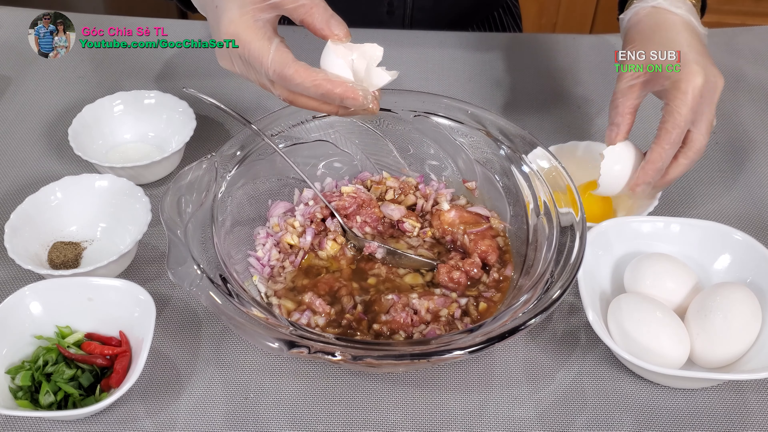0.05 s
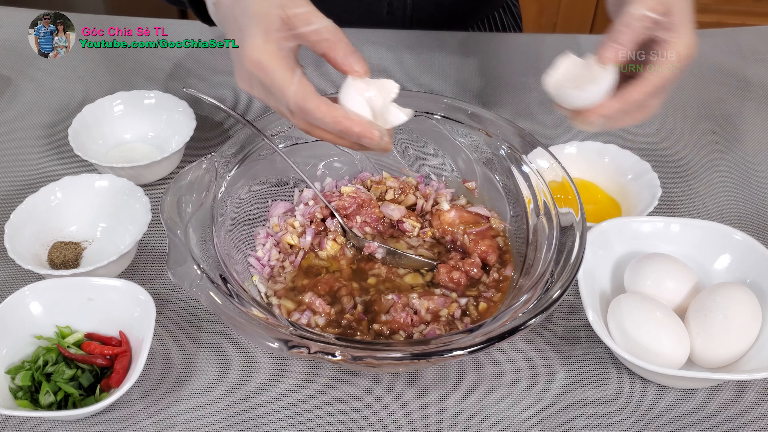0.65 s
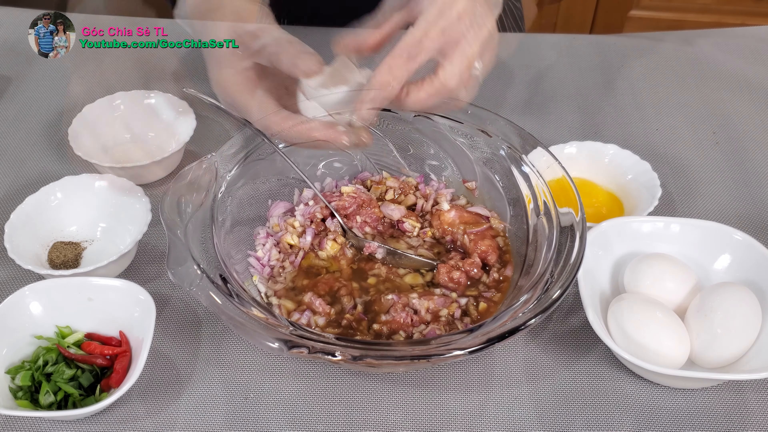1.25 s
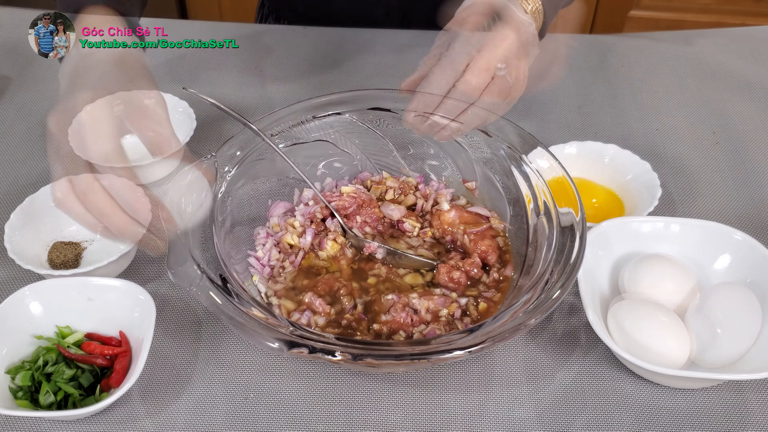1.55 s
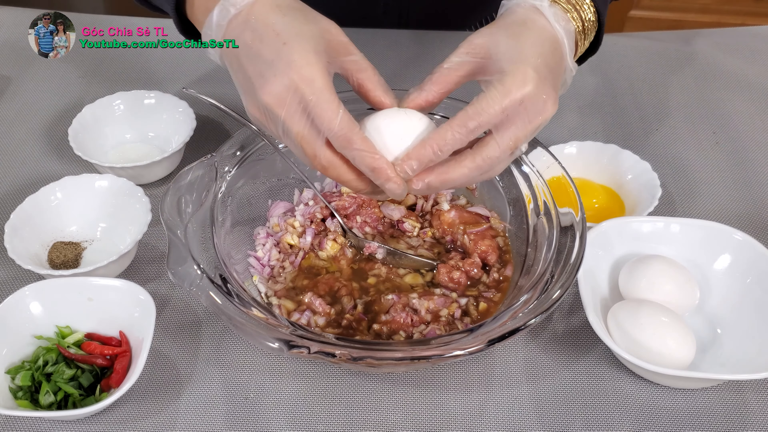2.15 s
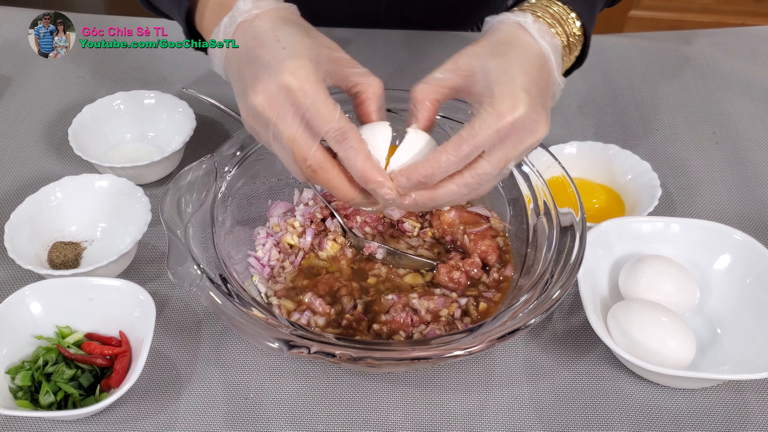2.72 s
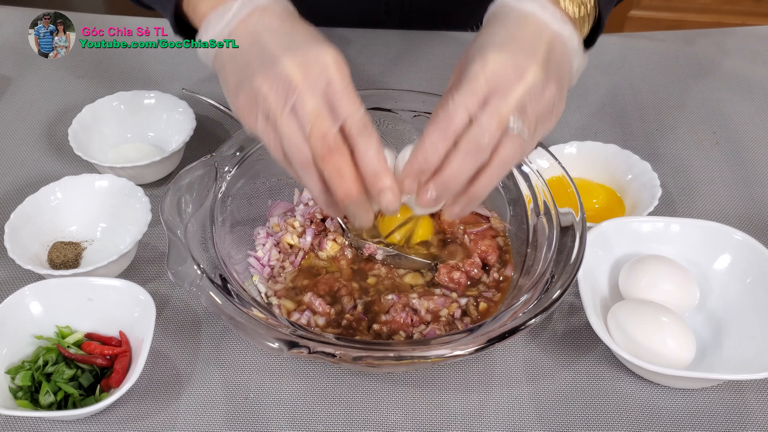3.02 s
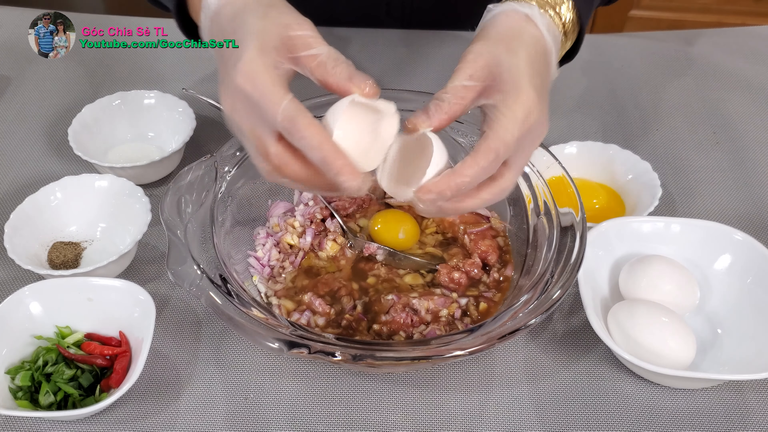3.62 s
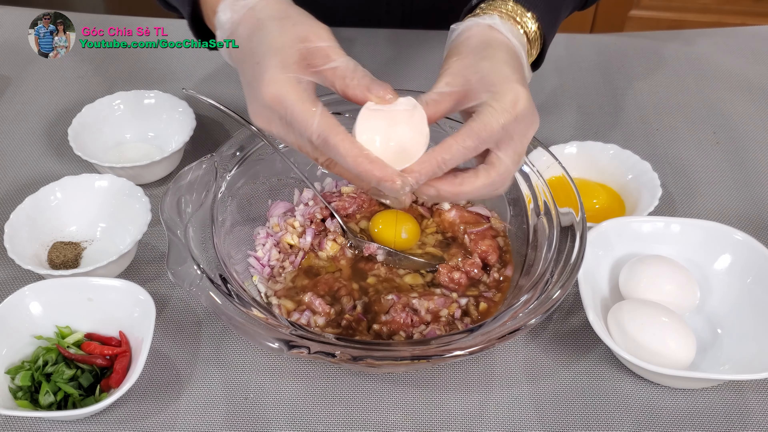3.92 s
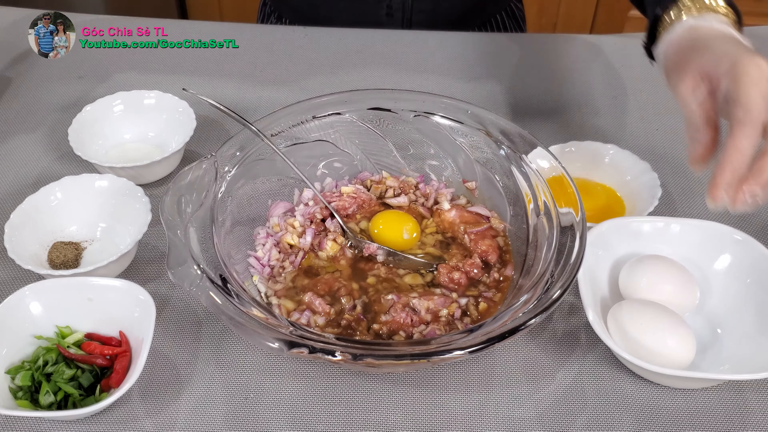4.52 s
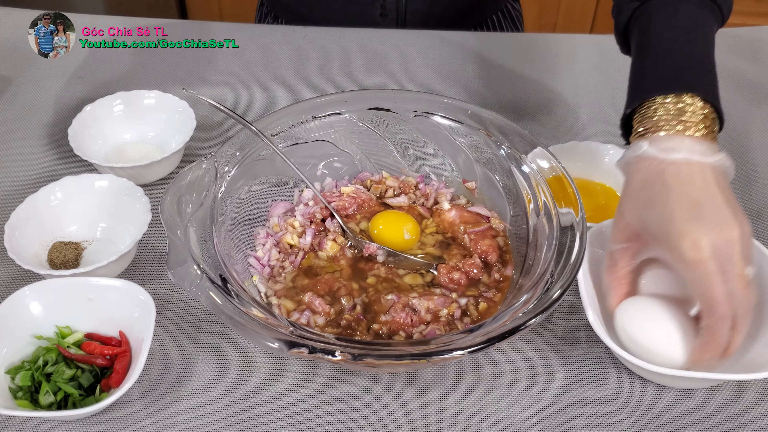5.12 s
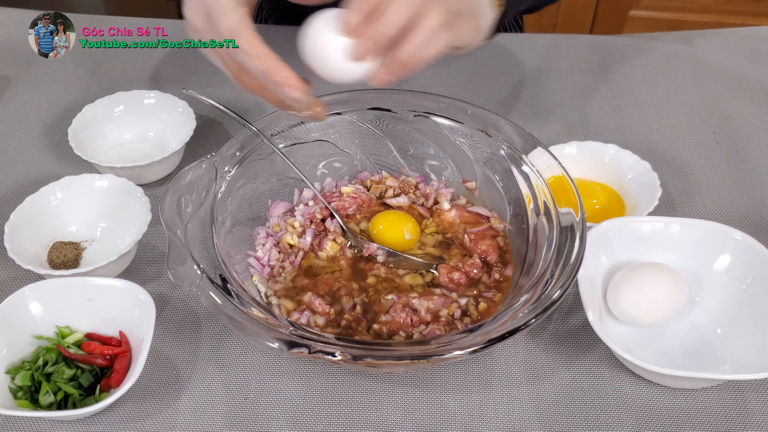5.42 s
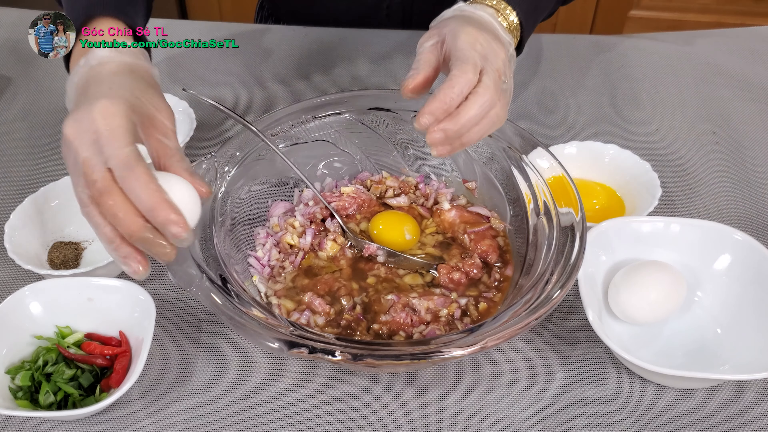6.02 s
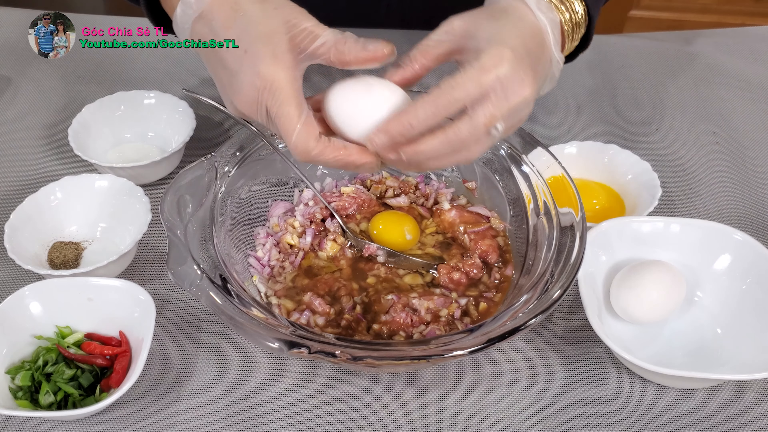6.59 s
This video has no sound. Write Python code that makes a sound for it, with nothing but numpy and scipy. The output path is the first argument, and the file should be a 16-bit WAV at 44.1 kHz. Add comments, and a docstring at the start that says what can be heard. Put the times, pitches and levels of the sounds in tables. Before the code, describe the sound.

In a home kitchen, close to the microphone, eggshell crackles lightly in gloved hands. An egg is struck sharply on a china bowl, which rings briefly, then the shell is pried open with small snaps and hollow crunches. Off to the side a drawer rolls faintly and an empty shell rattles into a bin. Soft, dull knocks surround a second egg strike, over a low appliance hum.

```python
"""A home kitchen with hard walls, one microphone close to the mixing bowl. Two eggs are struck on the
china rim, and bowl and table ring. Gloved hands pry and crush the shells; the breaks tick and sound the
air in the hollow. Off to the side a drawer rolls and an empty shell bounces into its bin. Dull knocks set
a pan ringing faintly. Behind it all an appliance hums, and a low rumble follows the cook's movements."""
import sys
import numpy as np
from scipy import signal
from scipy.fft import rfft, irfft, next_fast_len
from scipy.io import wavfile
from scipy.ndimage import map_coordinates

SR = 44100
rng = np.random.default_rng(int(sys.argv[2]) if len(sys.argv) > 2 else 0)


def wrap_up_sound(samples):
    """Save the sound to the file named by the first command line argument, as 16-bit audio."""
    columns = np.atleast_2d(samples).T
    # keep every value between -1 and 1, then stretch to whole-number steps
    tamed = np.clip(columns, -1, 1)
    steps = np.round(tamed * 32767).astype(np.int16)
    wavfile.write(sys.argv[1], SR, steps)


N = 297675
T = np.arange(int(.6 * SR)) / SR  # time within one short sound, t/s

# Levels in the tables are relative; each source sets its own gain.
# reverberation of the kitchen: f/Hz, t60/s
WALL_DECAY = [(100, 0.67), (500, 0.34), (1500, 0.42), (2500, 0.36), (5000, 0.38), (9000, .31),
              (15000, 0.24)]
# tones of the motor: f/Hz, level/dB
MOTOR_TONES = [(59.2, -62.5), (274.5, -66.5), (506.0, -87.5), (888.2, -89.5)]
# steady background rumble and faint hiss, with the top treble cut off: f/Hz, level/dB
ROOM_SPECTRUM = [(22, -27), (35, -7), (55, -1), (80, 0), (130, -2.5), (200, -7.5), (280, -3.5),
                 (400, -15.5), (600, -23.5), (900, -29), (1300, -35), (3000, -45), (11000, -46.5),
                 (15800, -66.5)]
# low room rumble rising and falling as the cook moves: t/s, level/dB
COOK_MOVEMENT = [(0.0, -64.5), (1.92, -58), (2.52, -61.5), (3.57, -59.5), (3.93, -55.5), (5.15, -62),
                 (5.32, -54), (6.26, -54), (6.75, -57.5)]
# each shell in the hands: first touch t/s, air note f/Hz, sinking rate/(Hz/s)
HELD_SHELLS = [(0.681, 2600, 650), (2.78, 2080, 1900), (3.42, 1920, 0), (3.79, 1943, 3500),
               (5.601, 1950, 0)]
# air in a half shell, a short closed pipe: f/air note, t60/s, level/dB
HOLLOW_MODES = [(0.701, 0.017, -18.5), (1, 0.0089, 6.5), (1.2, 0.0055, -11.5), (1.9, .014, -19.5),
                (2.85, 0.013, -14)]
# single snaps of shell: t/s, hollow pop level/dB, tick level/dB, tick f/Hz
SHELL_SNAPS = [(0.693, -64.5, -61.5, 6000), (0.9695, -57, -34.5, 5200), (.980, -41.5, -35, 5340),
               (1.005, -45, -29.5, 8300), (1.039, -42.5, -37, 9000), (1.099, -37.5, -45, 7000),
               (1.234, -34.5, -50, 6000), (2.123, -76, -42.5, 4950), (2.417, -60.5, -55.5, 9420),
               (2.794, -53, -38, 8100), (2.818, -66, -37.5, 4700), (2.8688, -49.5, -33, 6000),
               (2.9197, -40.5, -64, 4000), (2.931, -35.5, -60, 4000), (2.9483, -30, -35.5, 6300),
               (2.957, -25.5, -39, 3350), (3.0243, -24, -35, 4800), (3.0279, -40, -44, 4880),
               (3.425, -75.5, -53.5, 9000), (3.793, -27, -51, 3970), (3.852, -32, -36, 5400),
               (3.8634, -35, -32.5, 7900), (4.027, -63, -43.5, 5000), (4.0713, -50, -60, 5020),
               (5.667, -67.5, -54, 8850), (5.697, -55, -45, 8280), (6.639, -49.5, -68, 7000)]
# spectrum of a tick: f/tick pitch, level/dB
TICK_SPECTRUM = [(.06, -43), (.25, -16), (.6, -9.5), (0.999, 2.5), (1.3, -8), (2, -10.5), (3.2, -21)]
# squeezes that crumble the shell: t/s, length/s, hollow level/dB, splinter level/dB
SHELL_SQUEEZES = [(0.941, 0.044, -60.5, -55.5), (1.013, 0.023, -67, -46.5), (1.078, 0.034, -47.5, -54),
                  (1.108, 0.058, -55.5, -62), (1.166, 0.082, -47.5, -60), (1.247, .045, -64, -65),
                  (2.786, 0.03, -82, -51), (3.44, 0.058, -67.5, -69.5), (3.797, 0.044, -37.5, -44),
                  (3.838, .037, -34, -40.5), (3.962, .09, -75, -69), (6.643, 0.038, -57.5, -79)]
# spectrum of splintering shell: f/Hz, level/dB
SPLINTER_SPECTRUM = [(300, -8), (1000, -11.5), (2500, 2), (3500, -3), (5000, 5), (7000, -6), (10500, 0),
                     (13000, -5), (16000, -30)]
# egg on the rim: t/s, knock level/dB, knock f/Hz, crack level/dB, table level/dB, bowl level/dB
RIM_BLOWS = [(1.5663, -12, 695.3, -22, -33.5, -23), (6.089, -14.5, 667, -21.5, -34.5, -28.5)]
# spectrum of an impact's thud: f/Hz, level/dB
THUD_SPECTRUM = [(25, -28), (60, -10), (200, 3), (450, -1.5), (720, -3.5), (950, -9), (1200, 2),
                 (1500, -7.5), (1950, 3.5), (2700, -22.5), (6000, -34.5), (16000, -62)]
# spectrum of cracking shell: f/Hz, level/dB
CRACK_SPECTRUM = [(500, -0.5), (1500, -3), (3000, -0.5), (5500, -3.5), (7500, -5), (9700, -8.5),
                  (13000, -12.5), (16000, -25)]
# modes of the china bowl: f/Hz, t60/s, first blow level/dB, second blow level/dB
BOWL_MODES = [(680, 0.05, -4.5, -14.5), (824, 0.047, -11, 5), (1140, 0.062, -3.5, -31.5),
              (1251, 0.28, -12.5, -20), (1865, .16, -3, 5.5), (1947, 0.41, -11.5, -12),
              (1999, 0.03, -3.5, -15.5), (3154, 0.09, -19, -6.5), (3540, 0.055, -1.5, -0.5),
              (5580, 0.2, -17, -14.5), (5870, 0.11, -13, -36), (9620, 0.013, -1.5, 8)]
# modes of the table top: f/Hz, t60/s, level/dB
TABLE_MODES = [(78, 0.23, 5.5), (98, 0.12, 0), (126, 0.17, -4), (213, 0.075, -10.5)]
# gloved fingers shifting their grip: peak t/s, level/dB, rise/s
GLOVE_GRIPS = [(2.017, -83, .02), (2.123, -64, 0.03), (2.27, -76.5, .04), (2.42, -76, 0.019),
               (2.57, -84.5, 0.063), (5.05, -73, .012), (5.59, -80.5, .03), (5.69, -73, .03),
               (5.82, -80.5, .05), (5.97, -77, 0.044), (6.492, -65.5, 0.0083), (6.585, -78, 0.022),
               (6.66, -63.5, 0.042)]
# spectrum of the crinkling glove film: f/Hz, level/dB
GLOVE_SPECTRUM = [(1470, -9.5), (2700, -13), (4500, -3), (5450, -3), (7510, -17.5), (9730, -9.5),
                  (10600, -20), (13400, -14), (15500, -28)]
# dull knocks: t/s, level/dB, f/Hz, pan level/dB
DULL_KNOCKS = [(2.785, -46.5, 650, -82), (2.956, -42, 745, -86), (3.024, -46, 725, -90),
               (5.044, -44, 634, -63), (5.113, -31.5, 335, -60.5), (5.286, -34.5, 471, -58.5),
               (5.343, -33.5, 482, -49.5), (5.563, -35, 307, -68.5), (5.587, -30, 336, -51.5),
               (5.606, -41, 348, -51.5), (5.756, -34, 298.3, -72), (5.964, -30.5, 330, -47),
               (6.301, -30.5, 305, -46), (6.642, -33, 320.6, -58.5)]
# spectrum of their soft contact: f/Hz, level/dB
DULL_SPECTRUM = [(150, -18.5), (300, 1.5), (450, 2), (640, -2.5), (850, -9), (1300, -23.5), (2200, -41.5),
                 (5000, -46.5), (16000, -67)]
# modes of the pan: f/Hz, t60/s, level/dB
PAN_MODES = [(954, 0.68, -2.5), (2163, 0.53, -22)]
# rumble of the drawer's runners: f/Hz, level/dB
RUNNER_SPECTRUM = [(60, -16), (150, 5), (330, -8.5), (600, -15.5), (1000, -21.5), (3000, -35), (12000, -49)]
# ticking of its rollers: f/Hz, level/dB
ROLLER_SPECTRUM = [(800, -19), (2800, 5), (4500, -3), (8000, -17.5), (16000, -16)]
# bounces of the tossed shell: t/s, hollow level/dB, crack level/dB, thud level/dB
SHELL_BOUNCES = [(4.721, -36, -23.5, -42), (4.7241, -9.5, -26, -32.5), (4.732, -18, -37.5, -31),
                 (4.758, -17.5, -23.5, -35.5), (4.766, -18, -54.5, -30.5)]
# modes of the empty shell: f/Hz, t60/s, level/dB
HUSK_MODES = [(931, 0.047, -15), (1108, 0.021, -11), (1380, 0.0086, -4), (1856, 0.0098, 1),
              (2168, 0.0067, 5), (2193, 0.02, -12.5), (3565, 0.012, -8), (5450, 0.011, -15)]


def amp(db):
    """Decibels to gain."""
    return 10 ** (np.asarray(db) / 20)


def unit(x):
    """x at rms 1."""
    return x / np.sqrt(np.mean(x ** 2) + 1e-20)


def along(points, hz):
    """Read (f/Hz, value) points at hz, on a log frequency axis."""
    f, values = np.transpose(points)
    return np.interp(np.log(hz + 1), np.log(f + 1), values)


def fade(t60):
    """A decay of 60 dB in t60 seconds."""
    return np.exp(-np.minimum(np.log(1000) * T / t60, 30))


def add(track, s, sound):
    """Mix a sound into the track at s seconds."""
    part = track[round(s * SR):][:len(sound)]
    part += sound[:len(part)]


def colour(x, spectrum):
    """x filtered by the given spectrum, at rms 1."""
    gain = amp(along(spectrum, np.fft.rfftfreq(len(x), 1 / SR)))
    return unit(irfft(rfft(x) * gain, len(x)))


def drift(rate):
    """A smooth random curve with rate knots a second."""
    knots = rng.standard_normal(int(N * rate / SR) + 4)
    return map_coordinates(knots, [np.arange(N) * rate / SR])


def grains(size, rate, spread_db):
    """Sparse impulses of unequal strength, about rate a second."""
    hits = rng.random(size) < rate / SR
    return hits * amp(spread_db * rng.standard_normal(size)) * rng.choice([-1, 1], size)


def ring(modes, attack, detune=0.):
    """Damped sines from (f/Hz, t60/s, level/dB) rows; neighbours start in opposite directions."""
    tones = sum((-1) ** k * amp(db) * fade(t60) * np.sin(2 * np.pi * hz * (1 + detune * rng.normal()) * T)
                for k, (hz, t60, db) in enumerate(modes))
    return tones * (1 - np.exp(-T / attack))


def walls(build_up_s=0.0069):
    """The kitchen's dense tail at energy 1, duller as it fades."""
    hz, t, noise = signal.stft(rng.standard_normal(len(T)), SR, nperseg=256)
    decay = np.exp(-np.log(1000) * t / along(WALL_DECAY, hz)[:, None])
    tail = signal.istft(noise * decay, SR, nperseg=256)[1][:len(T)]
    tail *= 1 - np.exp(-(T / build_up_s) ** 2)
    return tail / np.linalg.norm(tail)


def kitchen(x, wet_db):
    """What reaches the microphone: direct sound plus the answer of the walls."""
    return x + amp(wet_db) * signal.fftconvolve(x, walls())[:len(x)]


def burst(spectrum, t60, attack, wet_db):
    """A puff of coloured noise; it leaves differently in every direction, so its echo is smooth."""
    envelope = fade(t60) * (1 - np.exp(-T / attack))
    direct = unit(colour(rng.standard_normal(len(T)), spectrum) * envelope)
    echo = amp(wet_db) * colour(walls(), spectrum)
    return (direct + echo) * np.sqrt(np.mean(envelope ** 2))


def appliance():
    """In the background, a motor hums, slightly unsteady in level and pitch."""
    t = np.arange(N) / SR
    hum = np.zeros(N)
    for hz, db in MOTOR_TONES:
        waver = amp(2.5 * drift(4))
        hum += amp(db + 4) * waver * np.sin(2 * np.pi * hz * t + .4 * drift(5))
    return hum


def room_tone(floor_db=-57.5):
    """Faint hiss over a low room rumble that rises and falls as the cook moves."""
    floor = amp(floor_db) * colour(rng.standard_normal(N), ROOM_SPECTRUM)
    rumble = signal.sosfiltfilt(signal.butter(2, 1200, fs=SR, output="sos"), floor)
    s, db = np.transpose(COOK_MOVEMENT)
    movement = unit(np.interp(np.arange(N) / SR, s, amp(db)))
    return floor + (movement - 1) * rumble  # the hiss stays level


def air_note(s, wide_open_hz=1644):
    """The pitch of the air in the shell held at s seconds: it sinks as the gap widens."""
    touches = [row[0] for row in HELD_SHELLS]
    start, hz, sink = HELD_SHELLS[max(np.searchsorted(touches, s) - 1, 0)]
    return max(hz - sink * (s - start), wide_open_hz)


def hollow(hz):
    """The brief ring of a half shell whose air sounds at hz."""
    return ring([(hz * ratio, t60, db) for ratio, t60, db in HOLLOW_MODES], attack=0.00063, detune=.015)


def snaps():
    """Close up, each break gives a bright tick and rings the air in the hollow shell."""
    pops, ticks = np.zeros((2, N))
    for s, pop_db, tick_db, tick_hz in SHELL_SNAPS:
        add(pops, s, amp(pop_db) * hollow(air_note(s)))
        spectrum = [(tick_hz * ratio, db) for ratio, db in TICK_SPECTRUM]
        add(ticks, s, amp(tick_db) * burst(spectrum, t60=0.0058, attack=0.000346, wet_db=-7))
    return kitchen(amp(-2) * pops, wet_db=-10.5) + ticks


def fractures(length_s, growth_db=5.5):
    """A run of tiny breaks that grows as the fingers press, then stops."""
    size = int(length_s * SR)
    pressure = amp(growth_db * np.linspace(-1, 0, size)) * signal.windows.tukey(size, .25)
    return np.pad(grains(size, rate=2200, spread_db=2.5) * pressure, (0, size))


def resound(breaks, hz):
    """The hollow of the shell answers every break; at rms 1."""
    return unit(signal.fftconvolve(breaks, hollow(hz))[:len(breaks)])


def crunches(slide_s=2.96, slide_hz=1050):
    """Squeezed shell splinters and its hollow rings; the wet egg slides out with a lower crackle."""
    hollows, splinters = np.zeros((2, N))
    for s, length, hollow_db, splinter_db in SHELL_SQUEEZES:
        breaks = fractures(length)
        add(hollows, s, amp(hollow_db) * resound(breaks, air_note(s + length / 2)))
        add(splinters, s, amp(splinter_db) * colour(breaks, SPLINTER_SPECTRUM))
    add(hollows, slide_s, amp(-53.5) * resound(fractures(length_s=.1), slide_hz))
    return kitchen(amp(-10.5) * hollows + amp(-11) * splinters, wet_db=-8)


def rim_blows():
    """Near the microphone the egg knocks on the rim and its shell caves in; bowl and table ring."""
    out = np.zeros(N)
    for k, (s, knock_db, knock_hz, crack_db, table_db, bowl_db) in enumerate(RIM_BLOWS):
        knock = kitchen(amp(knock_db) * ring([(knock_hz, .026, 0)], attack=0.0002), wet_db=-8.5)
        thud = amp(knock_db - 6.5) * burst(THUD_SPECTRUM, t60=.03, attack=0.0004, wet_db=0.5)
        crack = amp(crack_db) * burst(CRACK_SPECTRUM, t60=0.027, attack=0.0014, wet_db=2)
        modes = [(hz, t60, levels[k]) for hz, t60, *levels in BOWL_MODES]
        bowl = kitchen(amp(bowl_db) * ring(modes, attack=0.0017), wet_db=-5)
        table = kitchen(amp(table_db) * ring(TABLE_MODES, attack=.006), wet_db=-12)
        add(out, s, knock + thud + crack + bowl + table)
    return out


def gloves(relax_s=0.043):
    """Thin gloves crinkle, close and nearly dry: each grip swells, then the film settles."""
    t = np.arange(N) / SR
    level = sum(amp(db) * np.exp(np.minimum((t - s) / rise, (s - t) / relax_s))
                for s, db, rise in GLOVE_GRIPS)
    creases = grains(N, rate=3500, spread_db=4)
    return kitchen(amp(-0.5) * level * colour(creases, GLOVE_SPECTRUM), wet_db=-19)


def dull_knocks():
    """Soft, dull knocks; some leave a pan singing."""
    bodies, puffs, pan = np.zeros((3, N))
    for s, db, hz, pan_db in DULL_KNOCKS:
        add(bodies, s, amp(db) * ring([(hz, .07, 0), (hz * 1.85, .055, -5)], attack=0.0095))
        add(puffs, s, amp(db) * burst(DULL_SPECTRUM, t60=0.069, attack=0.0071, wet_db=0))
        add(pan, s, amp(pan_db) * ring(PAN_MODES, attack=0.046))
    bodies = signal.lfilter(*signal.butter(3, 900, fs=SR), bodies)  # a soft contact carries no treble
    return kitchen(amp(4) * bodies, wet_db=-10) + amp(-2.5) * puffs + pan


def drawer(start_s=4.06, length_s=0.655, ease_s=0.025, fall_db_per_s=16.5):
    """A drawer rolls faintly: its rollers tick, and the rumble of the runners falls as it slows."""
    t = np.arange(N) / SR - start_s
    motion = np.clip(np.minimum(t, length_s - t) / ease_s, 0, 1)
    rumble = amp(-59 - fall_db_per_s * t) * colour(rng.standard_normal(N), RUNNER_SPECTRUM)
    bumps = grains(N, rate=120, spread_db=3)
    rollers = amp(-86.5) * kitchen(colour(bumps, ROLLER_SPECTRUM), wet_db=-15.5)
    return motion * (rumble + rollers)


def tossed_shell():
    """Off to the side, with more room in its sound, the empty shell lands and rattles to rest."""
    out = np.zeros(N)
    for s, hollow_db, crack_db, thud_db in SHELL_BOUNCES:
        crack = burst(CRACK_SPECTRUM, t60=0.018, attack=0.00028, wet_db=3.5)
        crack = signal.lfilter(*signal.butter(1, 7000, fs=SR), crack)
        thud = kitchen(ring([(221, 0.14, -6.5)], attack=0.0021), wet_db=-9.5)
        thud += burst(THUD_SPECTRUM, t60=0.027, attack=0.0013, wet_db=1.5)
        husk = kitchen(ring(HUSK_MODES, attack=0.0012, detune=0.0076), wet_db=-0.5)
        add(out, s, amp(hollow_db) * husk + amp(crack_db - 3.5) * crack + amp(thud_db - 3.5) * thud)
    return out


def scene():
    """The kitchen as heard from the work table, in mono."""
    impacts = rim_blows() + drawer() + tossed_shell()
    hands = snaps() + crunches() + gloves()
    return (impacts + hands + dull_knocks() + appliance() + room_tone())[None]


def record(dry):
    """The microphone chain rolls off the top treble and keeps nothing above its band limit."""
    top_hz, roll_off_hz = 16400, 2200
    size = next_fast_len(N + SR)
    hz = np.fft.rfftfreq(size, 1 / SR)
    edge = np.clip((top_hz - hz) / roll_off_hz, 0, 1)
    return irfft(rfft(dry, size) * np.sin(np.pi / 2 * edge) ** 2, size)[:, :N]


dry = scene()
out = record(dry)
wrap_up_sound(out)
```